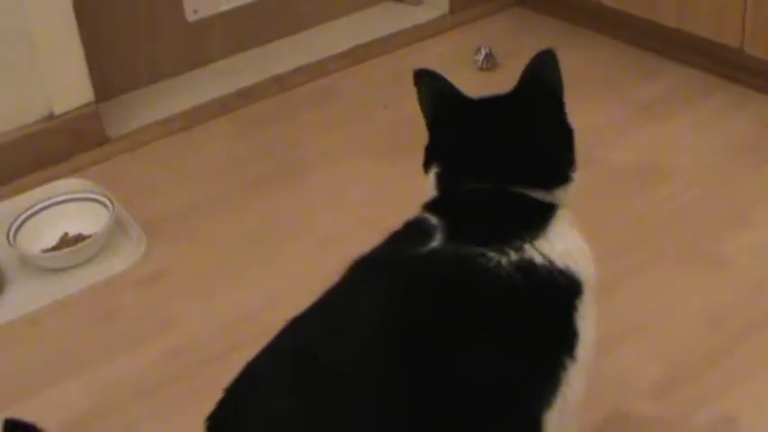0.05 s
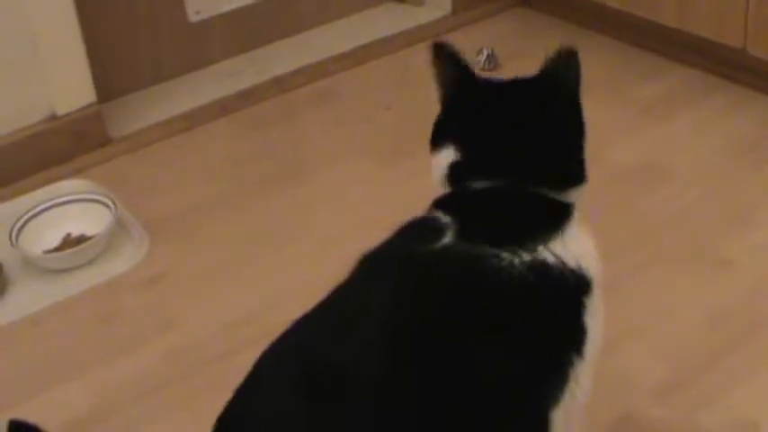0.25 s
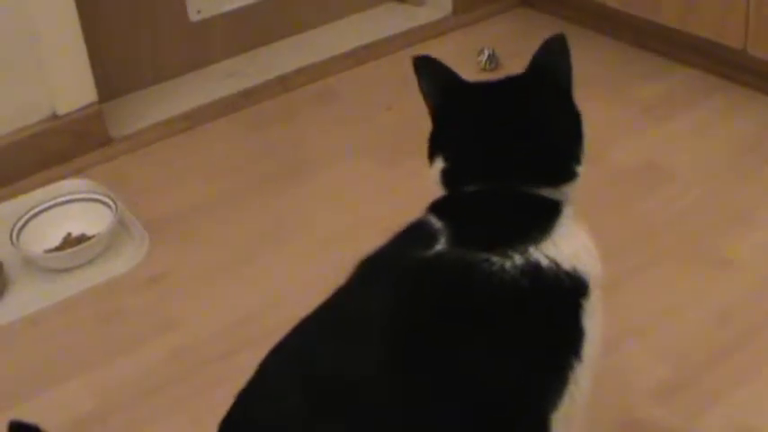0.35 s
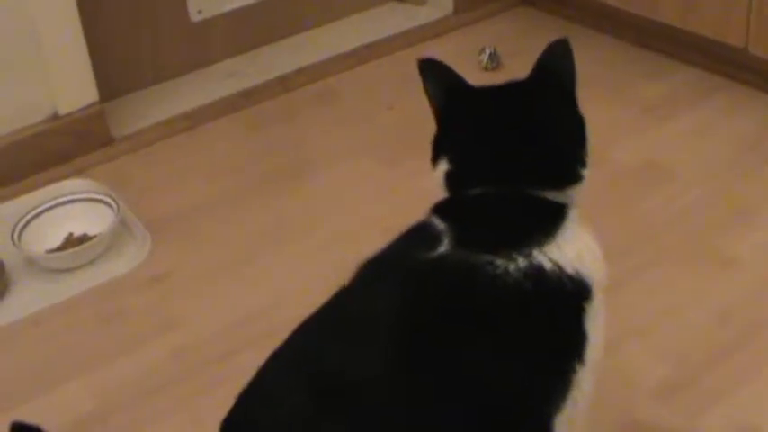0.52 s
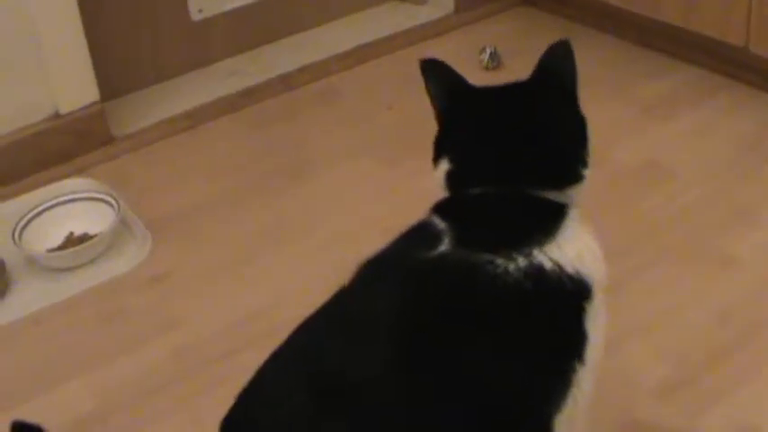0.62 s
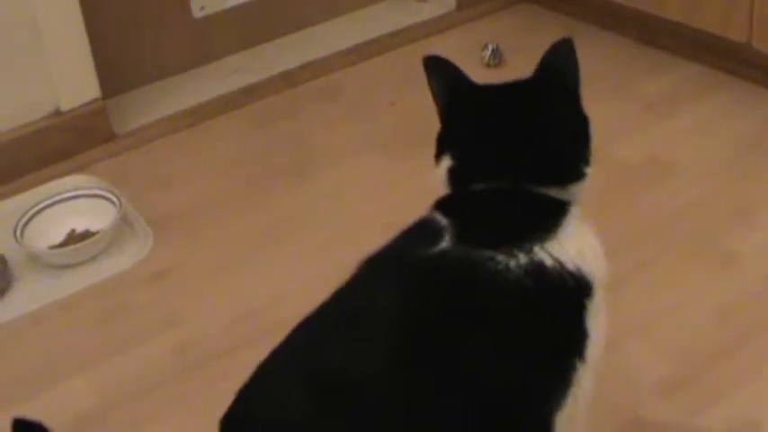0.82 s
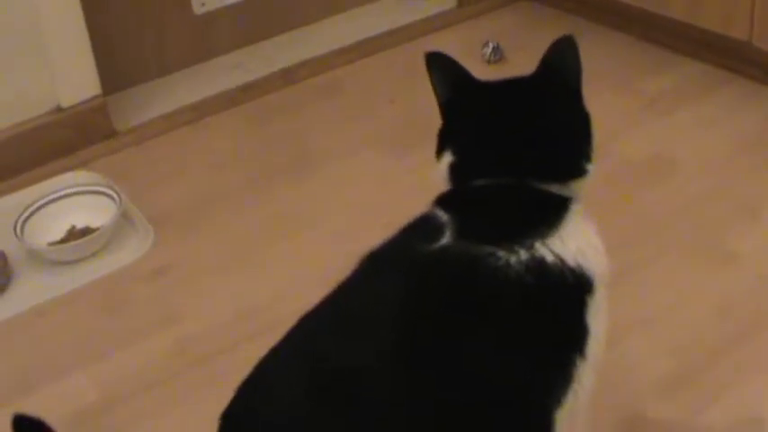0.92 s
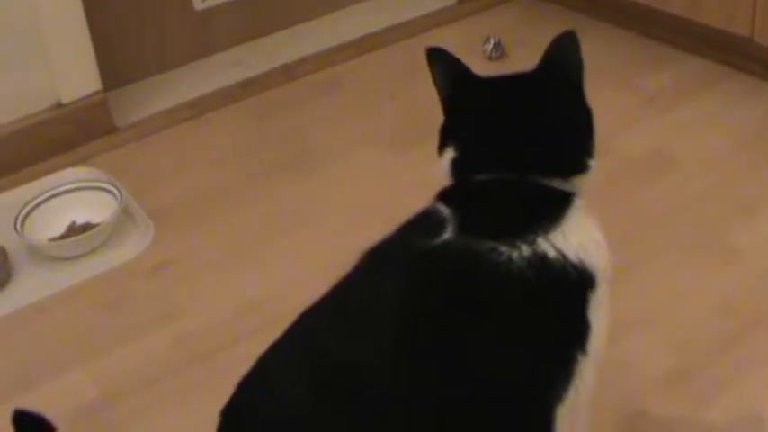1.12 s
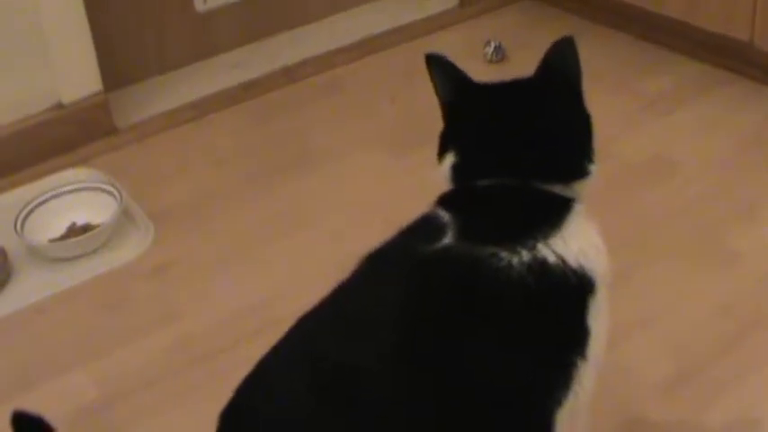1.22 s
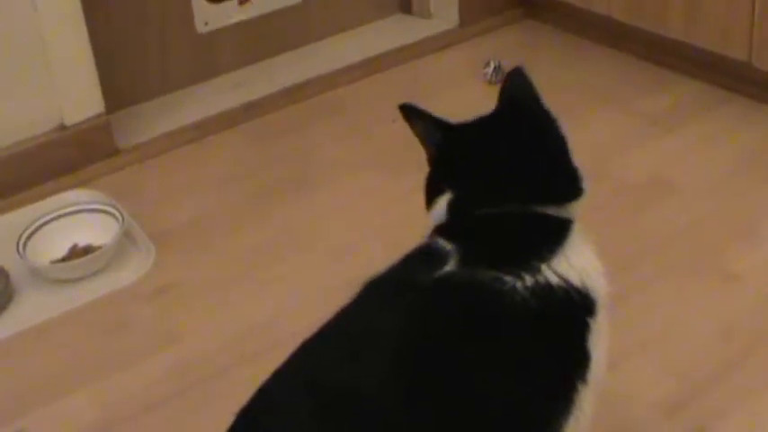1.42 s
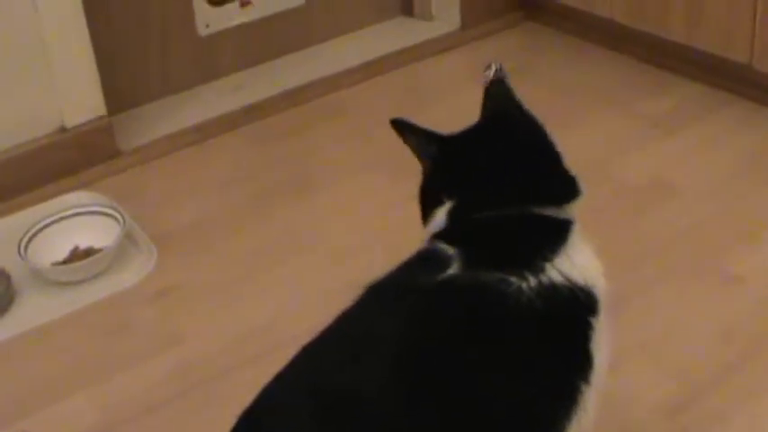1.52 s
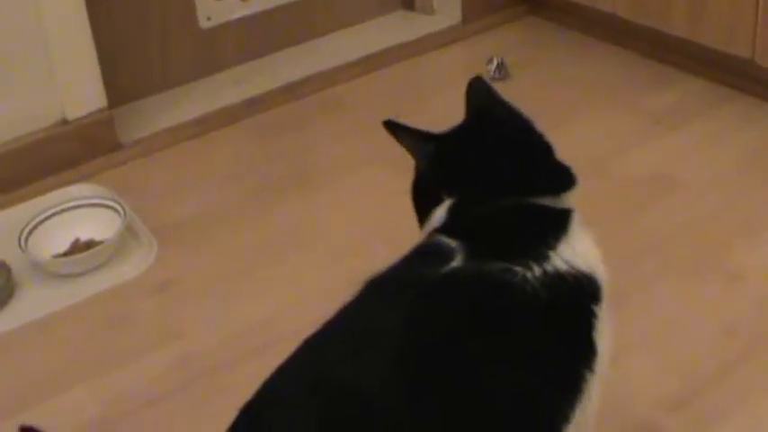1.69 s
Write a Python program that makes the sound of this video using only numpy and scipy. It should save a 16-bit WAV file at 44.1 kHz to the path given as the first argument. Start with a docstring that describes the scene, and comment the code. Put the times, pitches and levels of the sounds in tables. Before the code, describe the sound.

A small bell on a cat's collar jingles once, briefly, over quiet kitchen hum.

```python
"""A collar rustles and its small bell jingles once and settles: a cat flicks its head in a quiet kitchen.
The pellet rolls, scrapes and knocks in the fur-damped shell while the collar's metal fittings chatter.
Behind it: a short bright room, faint rumble and hiss, an appliance's hum and a thin steady whine."""
import sys
import numpy as np
from scipy import signal
from scipy.fft import rfft, irfft
from scipy.io import wavfile
from scipy.ndimage import uniform_filter1d

SR = 44100
rng = np.random.default_rng(int(sys.argv[2]) if len(sys.argv) > 2 else 0)


def persist_wave(psi):
    """Save psi, clipped to +-1, as 16-bit WAV."""
    counts = np.round(np.clip(psi, -1, 1) * 32767).astype(np.int16)
    wavfile.write(sys.argv[1], SR, np.atleast_2d(counts).T)


N = 77175

# Rumble and hiss. Each row: frequency in Hz, relative density in dB.
AIR_SPECTRUM = [(12, -53), (20, -10), (32, -29), (64, -4), (87, -22), (119, -2), (148, -15), (175, -8.5),
                (289, -2), (324, -9.5), (393, -5), (439, -16.5), (478, -8.5), (746, -12), (857, -14.5),
                (2210, -23.5), (15500, -28.5)]
# Each row: frequency in Hz, left-right correlation.
AIR_CORRELATION = [(60, 0.99), (200, .92), (380, 0.89), (700, 0.59), (1300, .12), (2400, .03), (4400, 0.28),
                   (8100, 0.61), (15000, .85)]
# Appliance tones. Each row: frequency in Hz, rms level in dB.
HUM_TONES = [(60, -69), (119.5, -67.5), (236, -70), (295, -63.5), (354, -67.5), (385, -66), (414, -68.5),
             (472, -70.5), (828, -72.5), (1363, -76), (15735, -72)]
# Room decay. Each row: frequency in Hz, T60 in seconds.
ROOM_DECAY = [(300, .5), (2000, 0.53), (4500, 0.58), (8000, 0.42), (15000, 0.31)]

# Friction spectra of fur and pellet. Each row: frequency in Hz, relative level in dB.
RUSTLE_SPECTRUM = [(200, -18), (800, -7), (1400, -1), (2100, -1), (3000, 2), (7400, -1.5), (8800, -3.5),
                   (12500, -5.5), (14000, -9), (16000, -14)]
SCRAPE_SPECTRUM = [(1000, -29), (2800, -27), (3300, -3.5), (4800, 5.5), (6000, -3), (7800, -3.5),
                   (9500, -12), (12000, -17), (13600, -12), (16000, -19)]
# Envelopes of fur, pellet and shell overtones. Each row: time in seconds, level in dB.
RUSTLE_ENVELOPE = [(.16, -74), (.2, -54), (.23, -48), (.28, -47.5), (.325, -52), (.37, -58), (.42, -87)]
SCRAPE_ENVELOPE = [(.25, -64), (.295, -45), (.322, -40), (.345, -46), (.39, -50), (.42, -59), (.55, -60),
                   (.6, -80), (.7, -71), (.76, -86)]
ROLL_ENVELOPE = [(.23, -70), (.27, -54), (.305, -41.5), (.335, -48), (.385, -41.5), (.42, -61.5),
                 (.48, -60), (.51, -53), (.54, -59), (.57, -62), (.69, -69.5), (.74, -85)]
OVERTONE_ENVELOPE = [(.25, -67), (.29, -51.5), (.305, -46.5), (.33, -60), (.357, -47.5), (.385, -57.5),
                     (.42, -66), (.54, -68.5), (.6, -90)]
# Metal resonances. Each row: frequency in Hz, bandwidth in Hz, relative level in dB.
FITTING_MODES = [(3236, 35, -2), (3454, 100, -4.5), (3604, 45, -3.5), (4020, 70, -8), (5110, 90, 1),
                 (5540, 140, 0.5), (5905, 80, -0.5), (6400, 120, -8), (14800, 110, -4)]
SHELL_MODES = [(4585, 72, -2.5), (4714, 56, 0), (4840, 72, -7)]
OVERTONE_MODES = [(10830, 200, -0.5), (11020, 110, 4)]
# Collar movements. Each row: centre in seconds, level in dB, Gaussian sigma in seconds.
FITTING_SHAKES = [(.324, -42, .012), (.35, -51.5, 0.029), (.457, -60, .012), (.553, -60.5, 0.011)]
COLLAR_TAPS = [(.46, -57.5, 0.023), (.555, -63.5, 0.017), (.717, -60.5, .01)]
# Pellet impacts. Each row: start in seconds, peak level in dB, shell pitch in Hz.
PELLET_KNOCKS = [(.271, -38, 4700), (.283, -35.5, 4700), (.300, -30, 4596), (.309, -29.5, 4594),
                 (.315, -30, 4577), (.331, -32, 4590), (.346, -48, 4650), (.359, -47, 4620),
                 (.371, -33.5, 4592), (.379, -44, 4620), (.399, -41, 4610), (.449, -47, 4850),
                 (.529, -40.5, 4690), (.538, -51, 4720), (.591, -52, 4850), (.671, -49.5, 4726),
                 (.683, -51, 4760)]


def amp(db):
    """Decibels to gain."""
    return 10 ** (np.asarray(db) / 20)


def unit_rms(x):
    """Scales to rms 1."""
    return x / np.sqrt(np.mean(x ** 2) + 1e-20)


def at_hz(points, hz):
    """Interpolates on a log-frequency axis."""
    f, value = np.transpose(points)
    return np.interp(np.log(hz + 1), np.log(f + 1), value)


def envelope(points):
    """Gain over time, silent outside the points."""
    time_s, db = np.transpose(points)
    return amp(np.interp(np.arange(N) / SR, time_s, db, left=-140, right=-140))


def swells(rows):
    """Gain over time of Gaussian swells."""
    t = np.arange(N) / SR
    return sum(amp(db) * np.exp(-.5 * ((t - centre_s) / sigma_s) ** 2) for centre_s, db, sigma_s in rows)


def contacts(rate_per_s=5000):
    """Dense random train of tiny impacts."""
    return rng.standard_normal(N) * (rng.random(N) < rate_per_s / SR)


def friction(spectrum):
    """Rubbing noise: tiny contacts shaped to a spectrum."""
    gain = amp(at_hz(spectrum, np.fft.rfftfreq(N, 1 / SR)))
    return unit_rms(irfft(rfft(contacts()) * gain, N))


def ringing(modes):
    """Tiny contacts keep each mode ringing, held at an even level."""
    out = np.zeros(N)
    for hz, width_hz, db in modes:
        pole = np.exp((-np.pi * width_hz + 2j * np.pi * hz) / SR)
        ring = signal.lfilter([1], [1, -pole], contacts())
        power = abs(uniform_filter1d(abs(ring) ** 2, size=900))
        out += amp(db) * ring.imag / np.sqrt(power + 1e-9)
    return unit_rms(out)


def air(level_db=-53.5, flicker_db=1.38):
    """Steady rumble and hiss, nearly mono in the bass; bands flicker slightly."""
    hz = np.fft.rfftfreq(2048, 1 / SR)
    re, im, side_re, side_im, flicker = rng.standard_normal((5, N // 512 + 5, len(hz)))
    correlation = at_hz(AIR_CORRELATION, hz)
    left = re + 1j * im
    right = correlation * left + np.sqrt(1 - correlation ** 2) * (side_re + 1j * side_im)
    flicker = uniform_filter1d(flicker, size=6, axis=0)
    flicker = unit_rms(uniform_filter1d(flicker, size=16, axis=1))
    spectra = np.array([left, right]) * amp(at_hz(AIR_SPECTRUM, hz) + flicker_db * flicker)
    _, noise = signal.istft(spectra.transpose(0, 2, 1), nperseg=2048, noverlap=1536)
    return amp(level_db) * unit_rms(noise[:, :N])


def hum(waver_db=1.5):
    """Motor and mains tones and a thin whine, each wavering slowly in level."""
    t, out = np.arange(N) / SR, np.zeros(N)
    rates_hz = np.geomspace(.5, 6, 10)
    for hz, db in HUM_TONES:
        waver = unit_rms(sum(np.sin(2 * np.pi * (rate * t + rng.random())) for rate in rates_hz))
        out += np.sqrt(2) * amp(db + waver_db * waver) * np.sin(2 * np.pi * (hz * t + rng.random()))
    return out


def kitchen(x, tail_db=-6, early_db=-5.5, early_decay_s=0.016):
    """Direct sound, quick reflections off floor and cupboards, and a short tail, different per ear."""
    t = np.arange(SR) / SR
    noise = rng.standard_normal((2, SR)) * (t > .004)
    hz, frame_s, spectra = signal.stft(noise, SR, nperseg=256)
    decay = amp(-60 * frame_s / at_hz(ROOM_DECAY, hz)[:, None])
    tail = signal.istft(spectra * decay, SR, nperseg=256)[1][:, :SR]
    early = rng.standard_normal((2, SR)) * (rng.random((2, SR)) < .03) * np.exp(-t / early_decay_s)
    response = sum(amp(db) * part / np.linalg.norm(part, axis=1, keepdims=True)
                   for db, part in [(tail_db, tail), (early_db, early)])
    return x + signal.fftconvolve(x[None], response, axes=1)[:, :N]


def collar(tap_hz=3620, tap_width_hz=300):
    """The strap rustles in the fur; its fittings chatter and settle with light taps."""
    rustle = envelope(RUSTLE_ENVELOPE) * friction(RUSTLE_SPECTRUM)
    chatter = swells(FITTING_SHAKES) * ringing(FITTING_MODES)
    taps = swells(COLLAR_TAPS) * ringing([(tap_hz, tap_width_hz, 0)])
    return rustle + chatter + taps


def bell(rise_s=0.0028, t60_s=0.039):
    """The pellet rolls, scrapes and knocks in the fur-damped shell."""
    out = envelope(ROLL_ENVELOPE) * ringing(SHELL_MODES)
    out += envelope(OVERTONE_ENVELOPE) * ringing(OVERTONE_MODES)
    out += envelope(SCRAPE_ENVELOPE) * friction(SCRAPE_SPECTRUM)
    for start_s, db, hz in PELLET_KNOCKS:
        age_s = np.maximum(np.arange(N) / SR - start_s, 0)
        attack = np.minimum(age_s / rise_s, 1)
        decay = amp(-60 * np.maximum(age_s - rise_s, 0) / t60_s)
        out += amp(db) * attack * decay * np.sin(2 * np.pi * (hz * age_s + rng.random()))
    return out


def scene(lean_db=0.46):
    """The jingle in the room, over a background that leans slightly left."""
    jingle = kitchen(bell() + collar())
    background = (air() + hum()) * amp([[lean_db], [-lean_db]])
    return jingle + background


def record(dry, cutoff_hz=15850):
    """Steep low-pass band limit."""
    lowpass = signal.firwin(1023, cutoff_hz, window=("kaiser", 9), fs=SR)
    return signal.oaconvolve(dry, lowpass[None], "same")


dry = scene()
out = record(dry)
persist_wave(out)
```